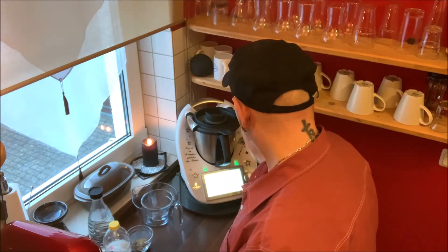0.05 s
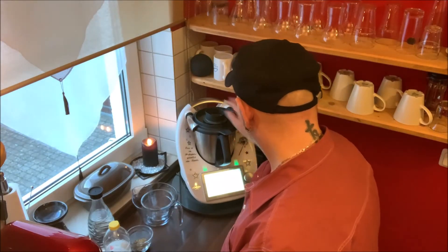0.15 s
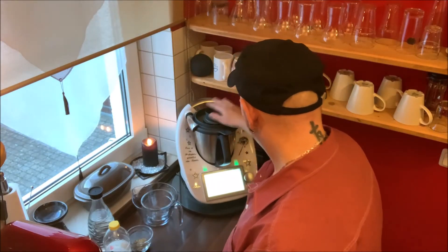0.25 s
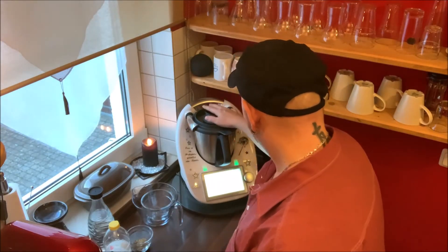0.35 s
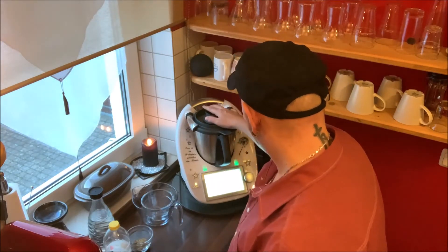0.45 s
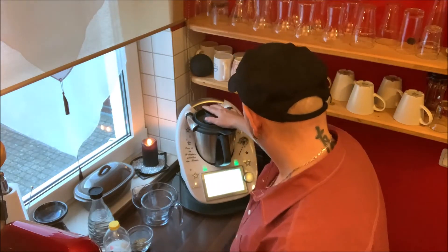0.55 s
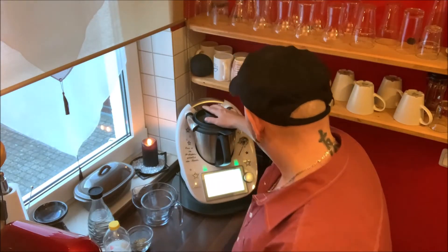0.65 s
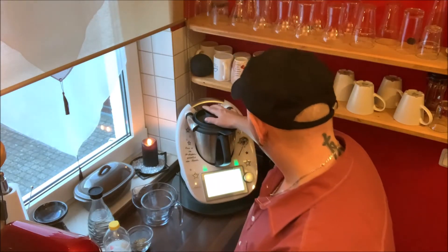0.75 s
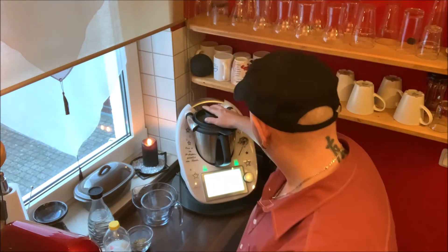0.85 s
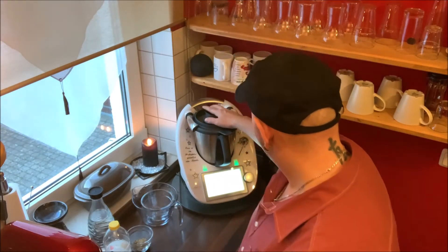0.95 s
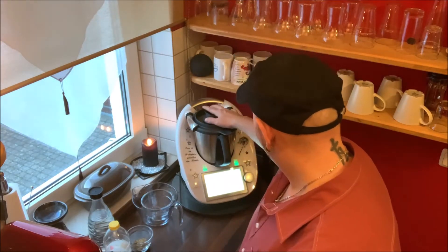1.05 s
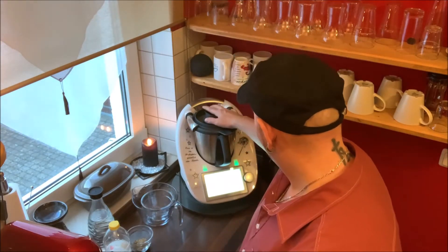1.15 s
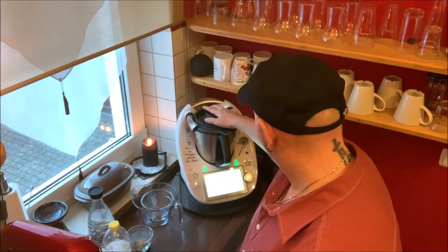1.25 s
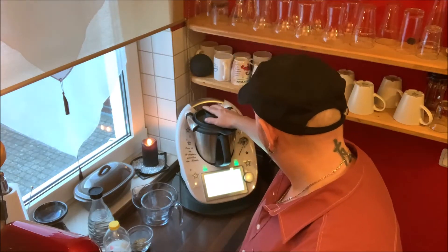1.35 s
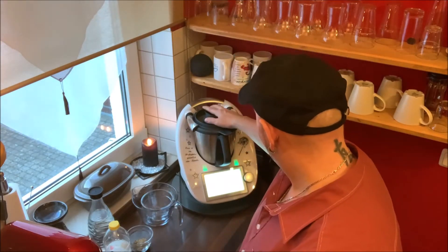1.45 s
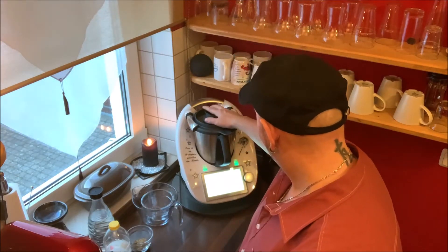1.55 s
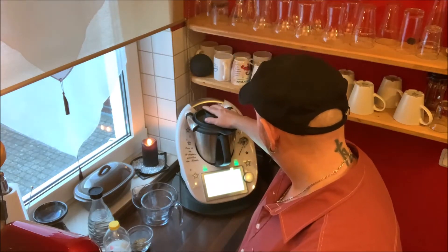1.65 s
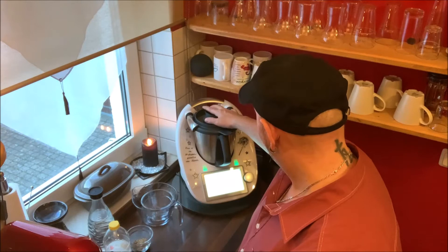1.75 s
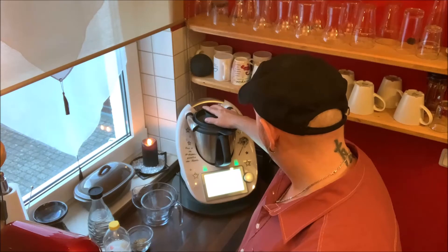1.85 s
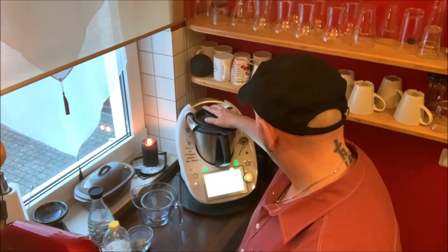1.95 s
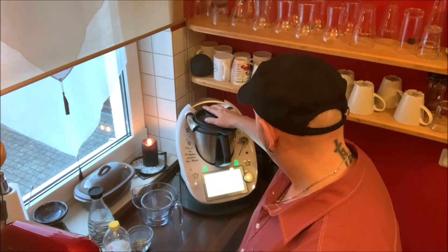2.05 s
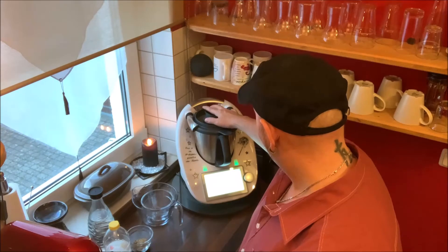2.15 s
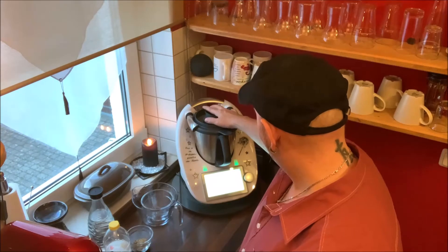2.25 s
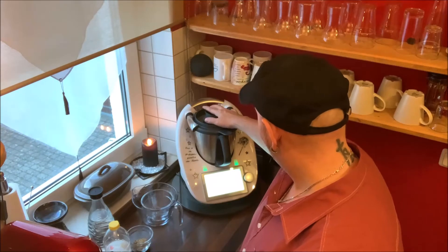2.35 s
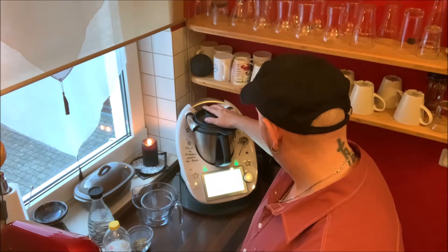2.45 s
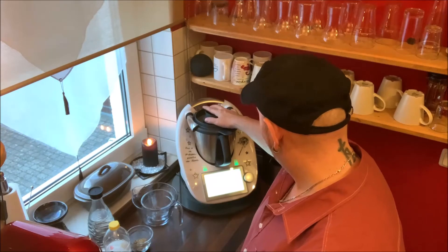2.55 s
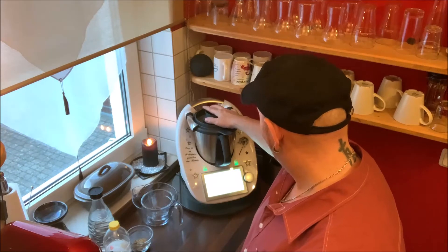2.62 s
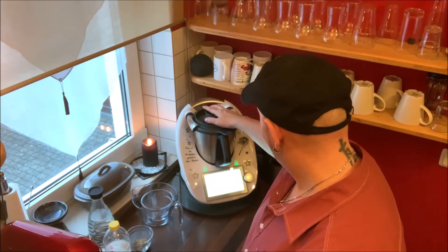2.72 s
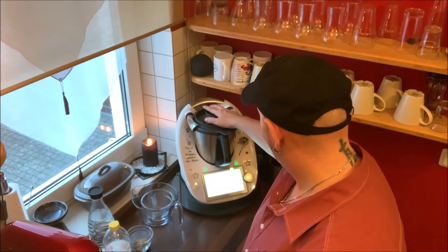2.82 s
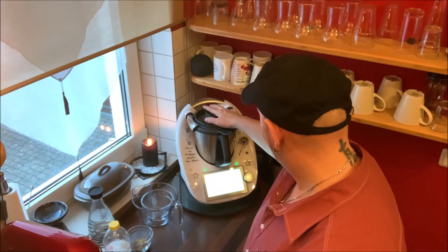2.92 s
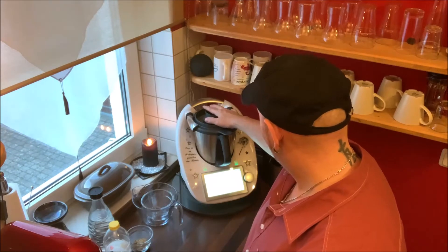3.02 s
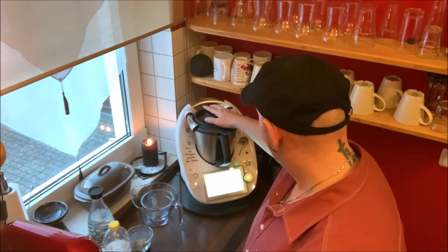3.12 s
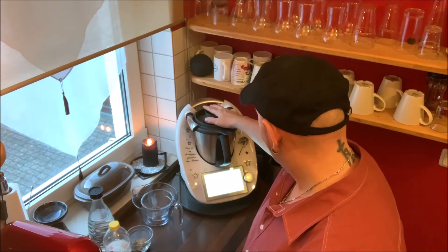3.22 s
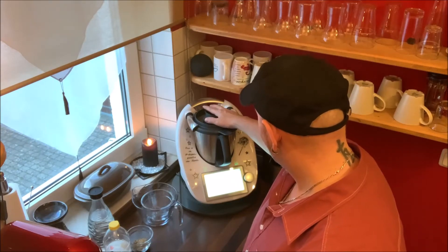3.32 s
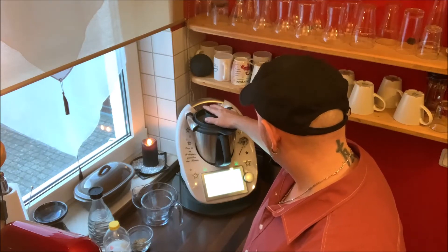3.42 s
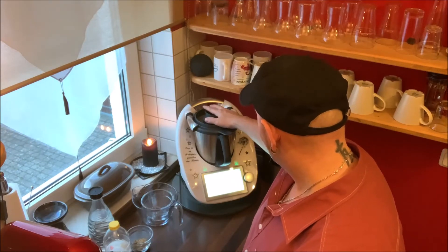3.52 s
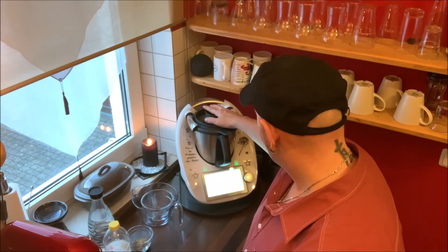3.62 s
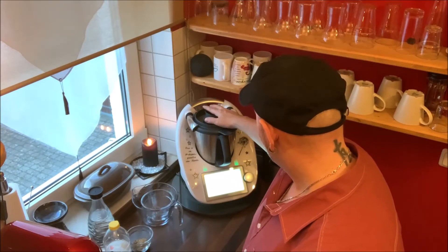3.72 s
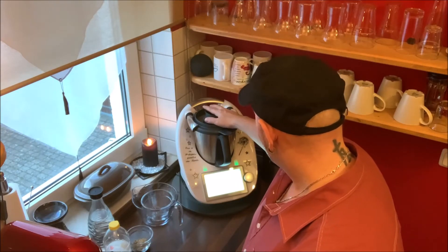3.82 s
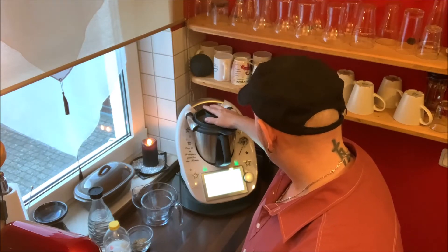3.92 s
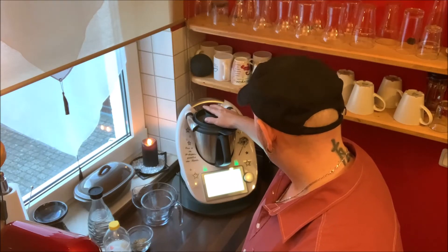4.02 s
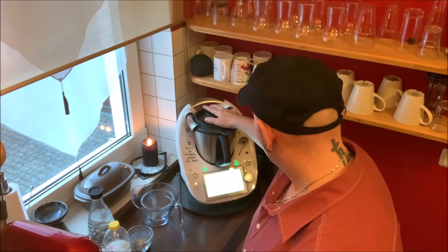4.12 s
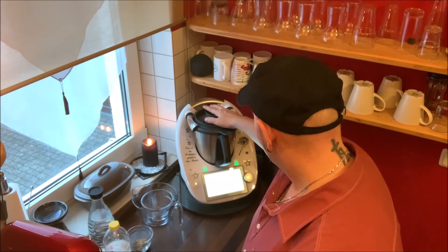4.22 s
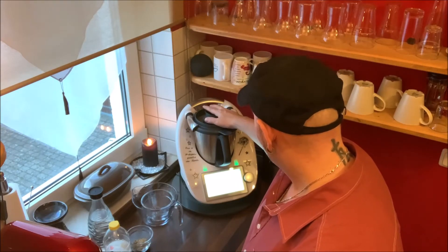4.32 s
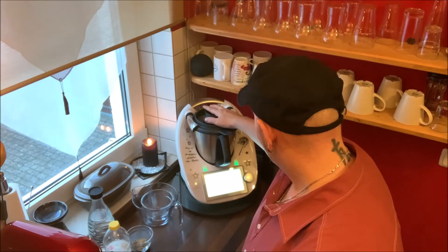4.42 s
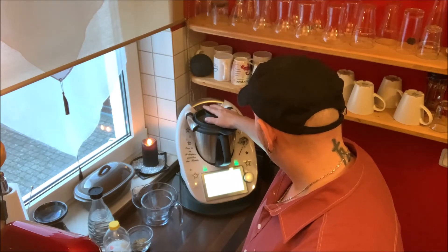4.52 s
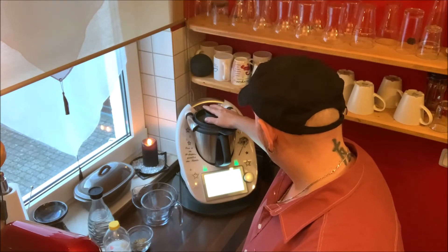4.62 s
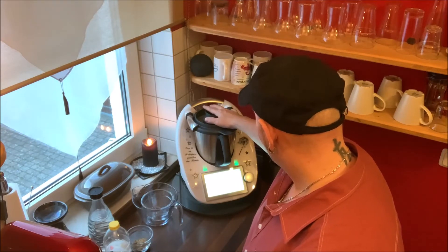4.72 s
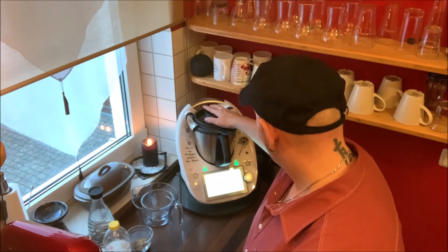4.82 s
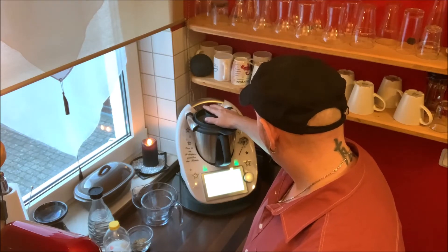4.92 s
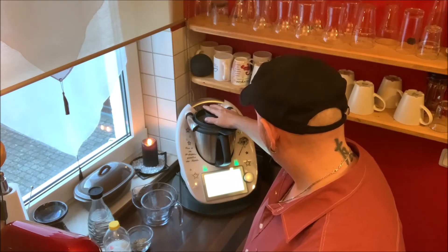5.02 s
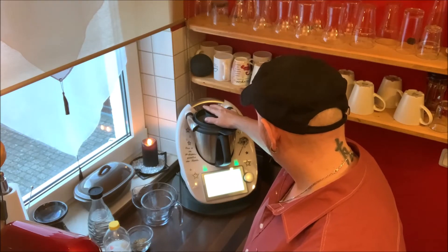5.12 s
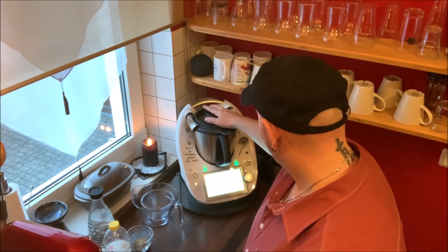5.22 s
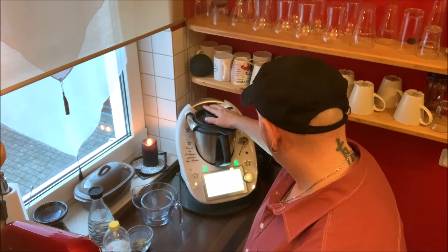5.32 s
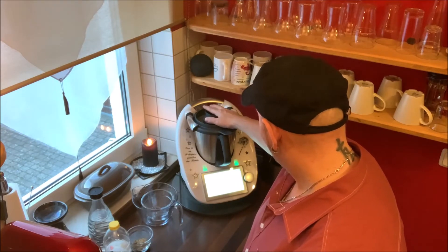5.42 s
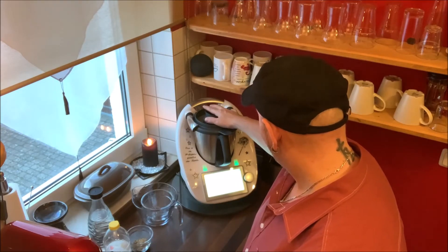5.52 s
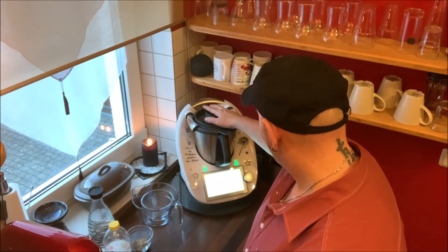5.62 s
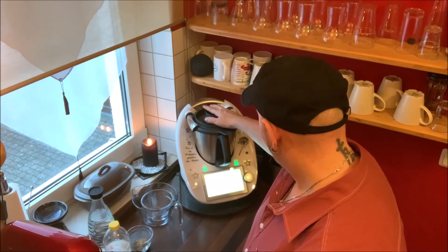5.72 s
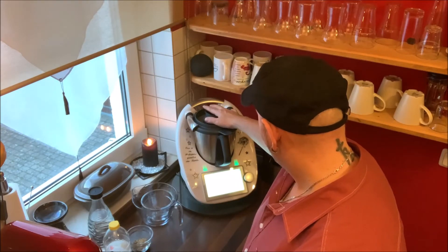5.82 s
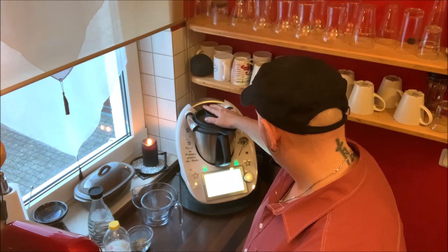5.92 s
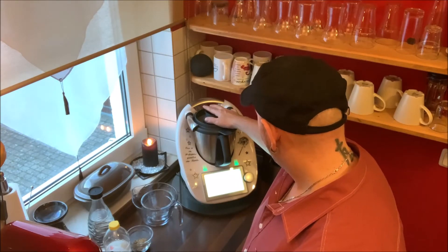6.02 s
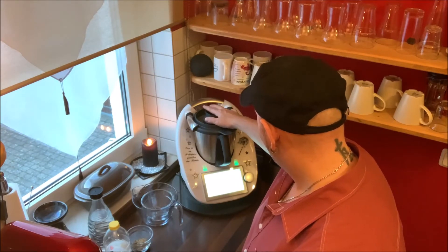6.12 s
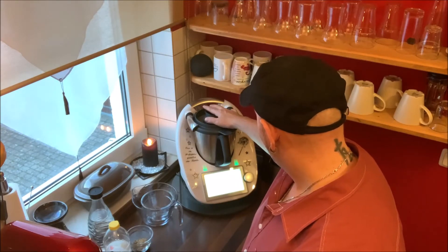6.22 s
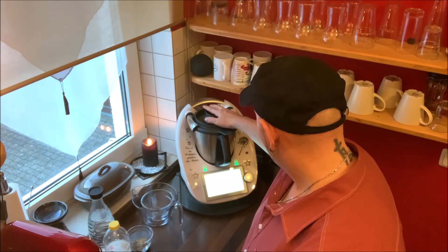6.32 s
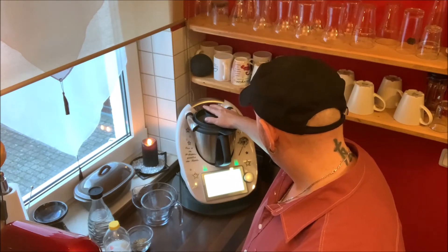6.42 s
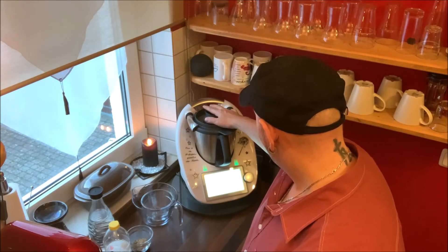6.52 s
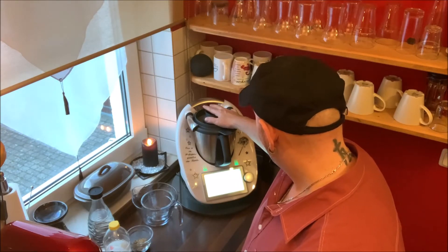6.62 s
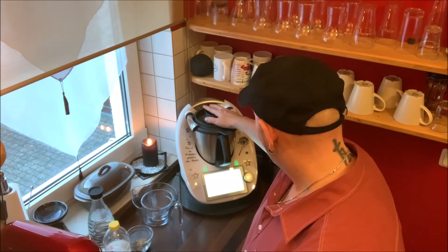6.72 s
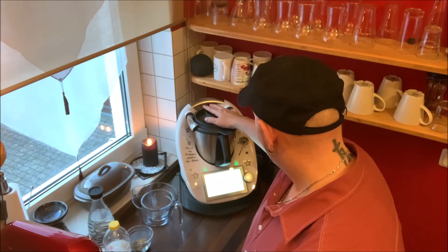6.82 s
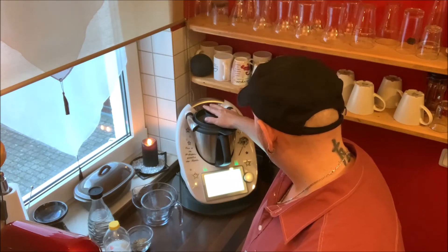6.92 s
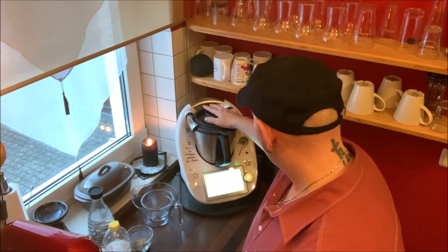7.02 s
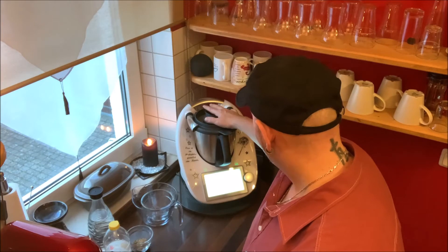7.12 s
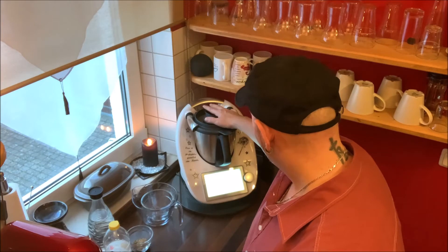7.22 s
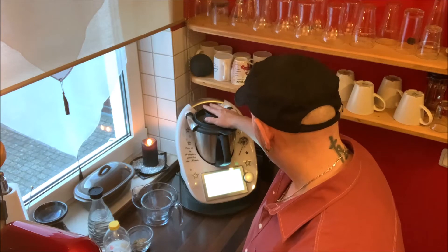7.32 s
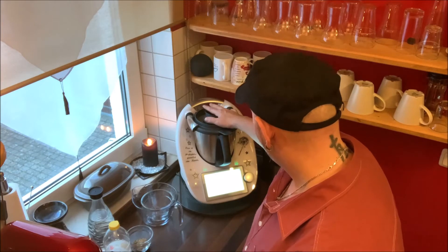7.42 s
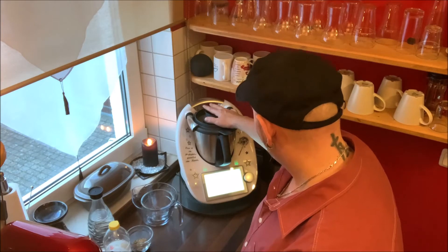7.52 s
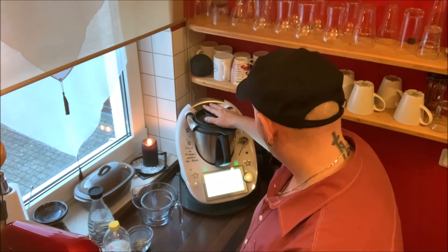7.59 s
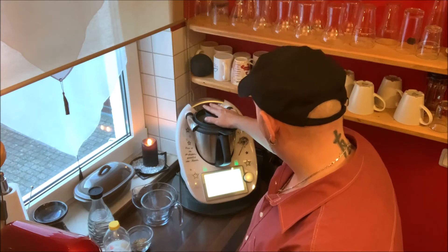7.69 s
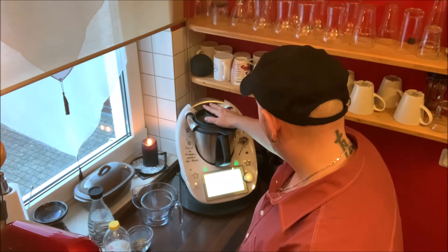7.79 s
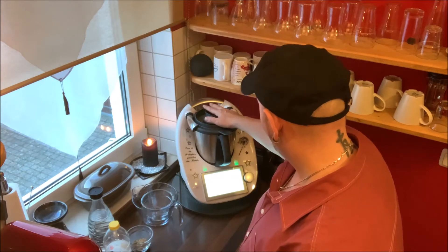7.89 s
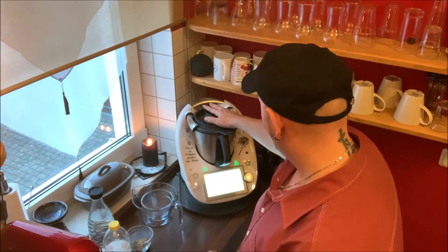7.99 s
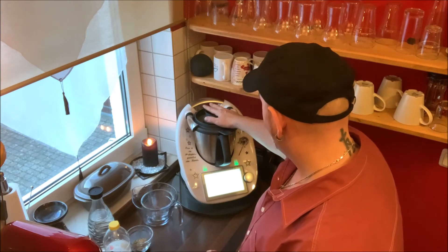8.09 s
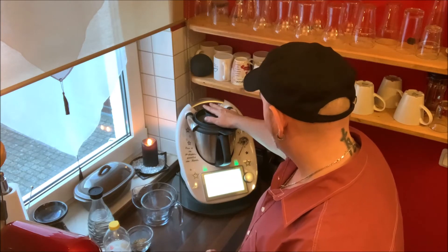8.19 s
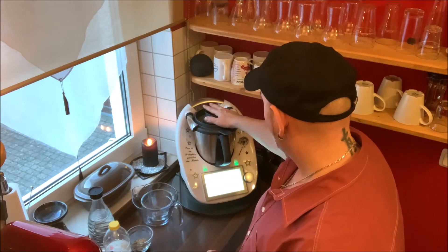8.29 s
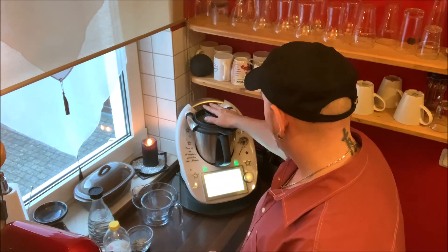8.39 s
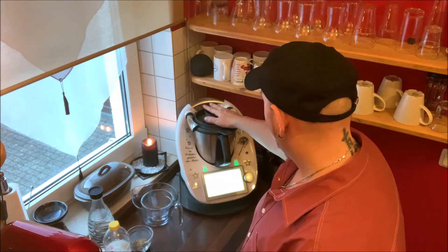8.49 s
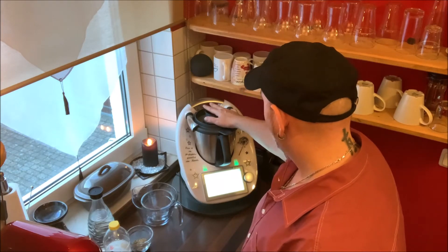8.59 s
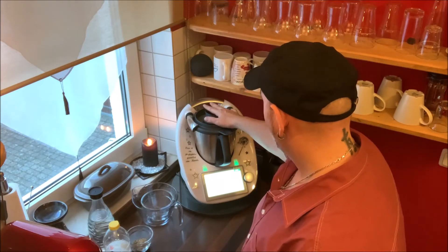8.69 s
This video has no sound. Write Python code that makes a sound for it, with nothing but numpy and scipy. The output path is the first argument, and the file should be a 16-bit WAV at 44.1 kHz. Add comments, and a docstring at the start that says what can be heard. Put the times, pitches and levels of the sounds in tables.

```python
"""Food processor on a kitchen counter

The lid slides into place with thuds and a few latch clicks, and the motor starts with a whine.
The blade then throws hard pieces against the steel bowl in a dense rattle until it is switched off.
Noise bursts model the blows, noise-driven resonances the ringing bowl, housing and counter, and
sine multiples of a wandering pulse rate the loaded motor, all in stereo in a small tiled room.
"""
import sys
import numpy as np
from scipy import signal
from scipy.fft import rfft, irfft, next_fast_len
from scipy.io import wavfile
from scipy.ndimage import uniform_filter1d, map_coordinates

SR = 44100
rng = np.random.default_rng(int(sys.argv[2]) if len(sys.argv) > 2 else 0)


def store_pcm(level_fs):
    """Save levels as 16-bit WAV."""
    pcm = np.round(np.clip(level_fs, -1, 1) * 32767).astype(np.int16)
    wavfile.write(sys.argv[1], SR, np.atleast_2d(pcm).T)


N = 385875
M = next_fast_len(N + SR // 2)  # transform length, in samples
HZ = np.fft.rfftfreq(M, 1 / SR)
TOP_HZ = 15800  # nothing is heard above this

# The still kitchen's colour. Each row: frequency in Hz, relative density in dB per Hz.
QUIET_COLOUR = [(15, -30), (25, 8), (69, 3), (289, -20), (523, -18), (631, -27), (703, -19), (1200, -21),
                (3930, -24), (7700, -30), (12500, -28), (15500, -39)]
QUIET_DB = -69.5
# Reverberation of the room. Each row: frequency in Hz, t60 in seconds.
KITCHEN_T60 = [(200, 0.47), (2000, 0.48), (8000, 0.36), (14000, 0.24)]
# Left-right likeness of the noise. Each row: frequency in Hz, correlation.
ALIKE = [(300, 0.45), (1200, 0.31), (2000, 0.79), (3300, 0.073), (5500, 0.24), (9000, 0.39), (12000, 1),
         (15000, .5)]
# Balance of noise. Each row: frequency in Hz, left minus right in dB.
LEAN = [(1000, -2.5), (5500, -0.5), (9000, 4), (15000, -2)]
# Phase of noise. Each row: frequency in Hz, left's lead in radians.
LEAD = [(1000, 0), (1700, -1.5), (3100, -.4), (3960, .3), (7320, -3.5), (9650, -1.8), (11200, -.2),
        (12700, .2), (15400, 2.5)]

# Colour of the sliding lid's scrape. Each row: frequency in Hz, relative density in dB per Hz.
SCRAPE_COLOUR = [(150, -57), (250, -14), (505, -8), (664, -18), (761, -6), (1040, -18), (1560, -10),
                 (2160, -13), (3440, -7), (4300, -21), (5370, -14), (6050, -21), (15000, -43)]
# Rings of the sliding lid. Each row: frequency in Hz, width in Hz, left and right relative
# level in dB, left's lead in radians. All mode tables share these columns.
RIM_MODES = [(760, 56, -8, -12, 0), (940, 67, 3, -6, 0), (1770, 30, -6, -6, 0), (1980, 53, -5, -5, 0),
             (2300, 47, -10, -11, 0), (2670, 50, -5, -5, 0), (2900, 57, -7, -7, 0), (3120, 45, -7, -8, 0),
             (3400, 130, -7, -9, 0), (3640, 60, -8, -8, 0), (5230, 140, -13, -14, 0),
             (5500, 140, -14, -15, 0)]
# Slide and boom hold, then die away.
SLIDE_HOLD_S, SLIDE_ROUGH_DB = 0.053, 1
SCRAPE_DB, SCRAPE_DIES_DB_PER_S = -43.5, 137
BOOM_DB, BOOM_DIES_DB_PER_S = -45.5, 168
# Latch clicks. Each row: start in seconds, level in dB, dB added to the colour below 4.5 kHz,
# dB added to it from 7.5 to 9.5 kHz, rise in seconds.
CLICKS = [(0.34, -42.5, 1.5, -7, .003), (0.4774, -41.5, 1.5, -5, .001), (0.719, -41.5, 0, 0, 0.0034)]
# Colour of a click before those additions. Each row: frequency in Hz, relative density in dB per Hz.
LATCH_COLOUR = [(400, -10.5), (1080, -15), (1300, -14), (2900, -12), (4200, -15), (5600, -12.5),
                (7000, -13.5), (8600, 1), (10000, -10), (11200, -1), (12500, -0.5), (13400, -10),
                (14500, -15), (15700, -22)]
# Rings of a click in the lid, with the columns of the mode tables.
CATCH_MODES = [(834, 40, -1, -3, 0), (1050, 41, 0, -2, 0), (1610, 35, -2, 0, 0), (1770, 51, -12, -12, 0),
               (1990, 60, -10, -7, 0), (2800, 84, -4, 1, 0), (3120, 50, -4, -2, 0), (3790, 72, -6, -7, 0),
               (4330, 200, -12, -12, 0)]
CATCH_DB, CATCH_T60_S = -13.5, 0.3  # level relative to the click, decay
# Thumps of the hand on the lid, jolts of the starting motor and the blade's first bite.
# Each row: start in seconds, tone level in dB, noise level in dB, frequency in Hz,
# rise in seconds, t60 in seconds.
THUMPS = [(.018, -52, -56, 3460, .006, .09), (1.344, -40, -14, 2800, 0.0027, 0.087),
          (.256, -60, -53, 955, 0.0047, 0.3), (0.264, -71, -49, 250, 0.0098, 0.34),
          (.36, -23.5, -32, 108.6, 0.02, 0.23), (.365, -39, -40.5, 391, 0.013, 0.2),
          (.45, -40, -48, 108, 0.0091, .25), (.724, -50, -60, 1082, .008, 0.14),
          (0.788, -56, -71, 108, .01, 0.17), (.808, -57, -66, 1082, .004, .07),
          (1.14, -43, -46, 196, 0.075, 0.55), (1.35, -18, -40, 197.3, 0.046, 0.64),
          (1.08, -55, -70, 966, 0.017, .4), (1.31, -14.5, -32, 97.5, 0.033, 0.3),
          (1.31, -29, -36, 60, 0.022, 0.33), (1.332, -40, -11, 1410, 0.01, 0.19)]

# The starting motor. Each row: time in seconds, high whine in dB, low whine in dB.
SPIN_UP = [(1.02, -91, -93), (1.045, -76, -81), (1.082, -88, -88), (1.091, -76, -66), (1.105, -60, -63),
           (1.13, -58, -61), (1.15, -61, -59), (1.175, -52, -59), (1.222, -50, -66), (1.238, -47, -60),
           (1.248, -40, -58), (1.27, -33, -42), (1.3, -33, -21), (1.39, -45, -23.5), (1.46, -51, -34),
           (1.55, -53, -49)]
# Tones of the high whine, with the columns of the mode tables.
HIGH_WHINE_MODES = [(1947, 52, 9, 12, -1.8), (2570, 110, -12, -9, 0), (2200, 500, -21, -21, 0)]
# Tones of the low whine, with the columns of the mode tables.
LOW_WHINE_MODES = [(955, 32, 4, 4, 0.95), (752, 20, -16, -8.5, 0), (1550, 90, -9, -7, 0.11),
                   (1256, 550, -14, -20, 0)]

# How hard pieces strike the steel. Each row: time in seconds, level of the rattle in dB.
STRIKES = [(1.12, -86), (1.2, -78), (1.235, -60), (1.262, -52), (1.291, -34.5), (1.309, -21), (1.34, -19),
           (1.42, -22.5), (1.5, -25), (1.58, -22.5), (2.15, -27), (2.27, -24.5), (2.35, -27), (2.58, -23.5),
           (2.72, -25.5), (2.85, -23.5), (3.0, -25.5), (3.2, -25), (4.2, -25.5), (5.0, -25.5), (6.1, -26.5),
           (7.35, -27.5), (8.6, -28), (8.692, -33.5), (8.75, -46)]
BITE_S, BITE_DIES_S = 1.37, 0.079  # first bite into the whole load, decay of the extra level after it
STOP_S = 8.61  # the motor is switched off
RATTLE_SWELL_DB, SWELLS_PER_S = 0.47, 16  # the load tumbles unevenly
# Colour of the rattle. Each row: frequency in Hz, relative density in dB per Hz.
CLATTER_COLOUR = [(40, -58), (150, -48), (310, -34), (450, -31.5), (700, -24.5), (1200, -26), (2400, -23.5),
                  (4000, -22), (6500, -25), (7200, -55), (9000, -120)]
# Colour of the crumbs' fizz. Each row: frequency in Hz, relative density in dB per Hz.
FIZZ_COLOUR = [(4000, -42), (6800, -2), (7650, -2.5), (8350, 2.5), (9200, -1), (9650, 1), (10200, -2.5),
               (11300, -4), (12500, -5.5), (14400, -7), (15100, -12), (15300, -45), (15700, -50)]
# Upper bowl modes, heard inside the rattle, with the columns of the mode tables.
SHELL_MODES = [(1422, 42, -19.5, -28, 2.2), (1570, 31, -35, -31, 1), (1762, 19, -12.5, -13, -1.1),
               (1816, 55, -19, -17, -2), (1945, 53, -15, -15.5, -2), (2220, 62, -31, -31, 2),
               (3543, 127, -18, -19.5, -2.1), (3923, 72, -18.5, -27.5, 0.5), (4250, 83, -19.5, -16.5, 1.5),
               (4920, 106, -18.5, -36, -0.5), (5535, 460, -29, -26.5, 1.1), (5680, 120, -18.5, -23, 1.5),
               (6880, 83, -28.5, -28.5, -0.5)]
# Noisy band around the motor's 1 kHz tone, with the columns of the mode tables.
TONE_BAND_MODES = [(977, 26, -4, -6.5, 0.83), (1014.3, 28, 0, 0.5, 1)]
# Low hum modes, with the columns of the mode tables.
HUM_MODES = [(173.2, 7.8, -9, -8.5, -.2), (198.2, 21.3, -3.5, -10, 0.044)]
# Lid modes, with the columns of the mode tables.
LID_MODES = [(650.5, 39, -16, -14.5, -4), (706, 27.5, -14.5, -10.5, 1.5), (749.4, 22.7, -7.5, -5, 1.84),
             (821, 17, -14, -13.5, 1.5), (904, 21, -15, -11, 2), (956, 47, -11, -13, 2)]
# Housing modes, with the columns of the mode tables.
HOUSING_MODES = [(270, 19.5, -20.5, -19.5, -4), (283, 3.5, -25, -23, -0.5),
                 (339.5, 15.6, -21.5, -16.5, 0.5), (370.4, 30, -20, -18, 0.5), (403.5, 26, -17, -27.5, 1),
                 (482.6, 34, -22.5, -18, 2.5), (524, 5.8, -17.5, -20.5, 2)]
# Counter modes, with the columns of the mode tables.
COUNTER_MODES = [(84, 27, -44, -37, 0), (101.6, 14, -18.5, -24.5, 0), (128.5, 14, -23, -29, 0)]
# Bowl wall modes, with the columns of the mode tables.
WALL_MODES = [(2742, 200, -10, -9, -1.2), (2830, 69, -7, -7.5, -0.64)]
# Response of each part to the strikes: dB over the rattle, drift in dB per second as the pieces get
# smaller, extra level in dB up to the bite, dying away after it, delay in seconds (held within 0.015
# either way), random swell in dB, gain on the rattle after the stop in dB per second.
FIZZ_PART = (-4.5, .5, 2.5, 2, 0.55, -18)
# Noisy band around the motor's 1 kHz tone, in the same columns.
TONE_BAND_PART = (-11, 0.63, 0, -2, 1.5, -75)
# Hum, in the same columns.
HUM_PART = (-9.5, 0.07, 5, 1, 1.5, 45.5)
# Lid, in the same columns.
LID_PART = (-3, -0.1, -4, -0.2, 1.67, 37.5)
# Housing, in the same columns.
HOUSING_PART = (-8.5, -0.18, 1, -0.5, 1.55, 15)
# Counter, in the same columns.
COUNTER_PART = (-20, -0.38, 10, -0.7, 0.5, 111)
# Bowl wall, in the same columns.
WALL_PART = (-6, -0.54, 2.5, .002, 1, -15)

# Large pieces hitting the bowl wall. Each row: start in seconds, level in dB.
CHUNKS = [(1.2988, -18.5), (1.3956, -18), (1.653, -28.5), (1.7723, -18), (1.8087, -16), (1.8805, -22),
          (2.0227, -11), (2.2043, -14.5), (2.556, -15), (2.7445, -28), (2.8867, -22), (3.0209, -19),
          (3.0653, -15), (3.1806, -16.5), (3.2728, -16), (3.3636, -17), (3.414, -23), (3.4604, -28),
          (3.7857, -16), (4.2252, -30), (4.3424, -13), (4.4087, -13), (4.6028, -16.5), (4.6482, -15.5),
          (4.711, -13), (4.8338, -16), (4.9705, -15), (5.1206, -20), (5.1965, -18), (5.3062, -17),
          (5.5083, -18), (5.57, -14), (5.8495, -17.5), (5.9403, -20), (6.1074, -20.5), (6.2361, -30),
          (6.505, -10.5), (6.9176, -23), (7.1974, -19), (7.388, -17), (7.6191, -22), (7.7576, -17),
          (7.8499, -19), (7.9243, -33), (8.1069, -19), (8.284, -22), (8.3698, -22), (8.4157, -21)]

# The loaded motor. Each row: time in seconds, pitch of the 5th multiple of its pulse rate in Hz.
SPEED = [(1.38, 1002), (1.46, 978.1), (1.54, 987.7), (1.6, 1021), (1.64, 990.2), (1.74, 986.3),
         (1.83, 1001), (1.97, 993.8), (2.25, 998.7), (2.33, 1020), (2.39, 995.5), (2.57, 989.3),
         (2.66, 997.6), (2.7, 1019), (2.78, 1000), (2.84, 1009), (3.0, 992.0), (3.08, 1003), (3.26, 990.9),
         (3.39, 1012), (3.41, 998.6), (3.67, 1009), (3.75, 990.4), (3.81, 1009), (3.95, 996.8),
         (4.24, 998.7), (4.28, 1013), (4.34, 994.3), (4.6, 1009), (4.62, 993.0), (4.73, 992.1),
         (4.76, 1005), (4.93, 990.0), (5.05, 1000), (5.15, 1021), (5.19, 992.1), (5.25, 1016), (5.39, 1004),
         (5.45, 985.3), (5.49, 1004), (5.56, 999.6), (5.6, 1008), (5.78, 996.7), (5.82, 1010),
         (6.25, 990.5), (6.35, 1004), (6.67, 994.5), (6.75, 1006), (6.98, 998.7), (7.12, 1014),
         (7.18, 978.1), (7.22, 980.0), (7.26, 1000), (7.52, 1009), (7.81, 995.1), (7.87, 1008),
         (8.4, 991.8), (8.46, 1008), (8.6, 998.6), (8.66, 1013)]
# Its loudness. Each row: time in seconds, level of the 5th multiple in dB, of the 1st in dB.
SINGING = [(1.38, -40, -31), (1.44, -35, -24), (1.48, -32, -46), (1.56, -45, -28), (1.64, -39, -49),
           (1.76, -34, -22.5), (1.83, -31, -34), (1.89, -42, -30), (1.97, -31, -30), (2.03, -31, -44),
           (2.09, -34, -26), (2.17, -31.5, -39), (2.27, -38, -21.5), (2.31, -37.5, -46), (2.61, -34, -33),
           (2.74, -32.5, -55), (2.86, -39, -31), (2.92, -35, -48), (2.96, -31.5, -32), (3.06, -34, -27),
           (3.12, -36, -47), (3.22, -33, -27), (3.3, -32, -40), (3.77, -37, -28), (3.93, -31.5, -44),
           (4.38, -34, -25.5), (4.46, -30, -33), (4.56, -41, -35), (4.74, -32, -49), (4.8, -35, -28),
           (4.89, -28.5, -40), (4.97, -29, -26.5), (5.41, -40, -43), (5.43, -31.5, -34), (5.62, -35, -34),
           (5.68, -31, -53), (5.74, -30.5, -27), (5.84, -35.5, -45), (5.96, -30.5, -26), (6.04, -31, -54),
           (6.25, -32, -31), (6.63, -29.5, -45), (6.69, -28.5, -30), (6.81, -36, -35), (6.85, -31, -49),
           (6.9, -29.5, -36), (7.14, -35, -34.5), (7.46, -29, -33), (7.58, -42, -33), (7.62, -28, -33.5),
           (7.77, -37.5, -40), (7.83, -27.5, -31), (7.91, -36, -34), (7.95, -33, -50), (8.25, -30.5, -32),
           (8.29, -32, -49), (8.35, -28, -37), (8.54, -35, -31), (8.58, -31.5, -44), (8.66, -44, -32)]
# Multiples that stand out. Each row: multiple, left and right gain in dB, left's lead in radians.
# The 1st follows its own level, the rest that of the 5th.
MULTIPLES = [(1, 2, -7, -0.1), (5, 2.5, 3.5, 1), (7, -22, -21, 2.5), (9, -14, -26, -1), (10, -19, -12, -1)]
FLUTTER_HZ, FLUTTERS_PER_S = 0.5, 18  # the load shakes the pulse rate
# The load shakes the level; the tone's phase drifts at random between left and right.
TONE_SWELL_DB, DRIFT_RAD = 1.2, 0.4
HUM_SURGE_DB, HUM_SLIP_RAD = 1.5, 0.6  # the rocking housing makes the 1st multiple surge and slip

# Hard crumbs snapping on the blade. Each row: start in seconds, peak level in dB.
SNAPS = [(1.5248, -17), (1.5881, -12), (1.7562, -14), (2.3499, -18), (2.535, -18), (3.1137, -15),
         (3.1516, -17), (3.3616, -10), (3.6834, -20), (3.7357, -10), (4.1478, -19), (4.3414, -21),
         (5.6429, -21), (5.9387, -20), (6.2755, -20), (6.7015, -11.5), (6.7629, -14), (7.3615, -16),
         (7.6763, -17), (7.8281, -14), (8.46, -20), (8.5413, -17)]
SNAP_T60_S, SNAP_CREST_DB = 0.049, 8  # decay; peak over mean strength


def amp(db):
    """Decibel law: the amplitude gain of a level in dB."""
    return 10 ** (np.asarray(db) / 20)


def unit(x):
    """Normalisation to a root mean square of 1."""
    return x / np.sqrt(np.mean(x ** 2) + 1e-20)


def along(points, hz):
    """Interpolation of (Hz, value) points on a logarithmic frequency axis."""
    f, v = np.transpose(points)
    return np.interp(np.log(hz + 1), np.log(f + 1), v)


def curves(rows):
    """Linear interpolation in time of each column, followed by a gate open only within the rows."""
    s, *cols = np.transpose(rows)
    t = np.arange(N) / SR
    return [np.interp(t, s, c) for c in cols] + [(t >= s[0]) & (t <= s[-1])]


def wobble(rate):
    """Random modulation: a smooth curve through rate random knots a second."""
    knots = rng.standard_normal(int(N * rate / SR) + 4)
    return map_coordinates(knots, [np.arange(N) * rate / SR])


def chance(*shape):
    """White noise: a complex Gaussian spectrum."""
    shape = (*shape, len(HZ))
    return rng.standard_normal(shape) + 1j * rng.standard_normal(shape)


def ringing(modes, stray=0.45, steep=1.57):
    """Modal resonance: noise, as of countless small blows, excites each mode; a stray part differs by side."""
    out = np.zeros((2, len(HZ)), complex)
    for hz, width, left_db, right_db, lead in modes:
        near = slice(*np.searchsorted(HZ, [hz / 3, 2 * hz + 500]))
        f = HZ[near]
        resonance = (f * width / (hz * hz - f * f + 1j * f * width)) ** steep
        common, left, right = rng.standard_normal((3, len(f))) + 1j * rng.standard_normal((3, len(f)))
        sides = amp([left_db, right_db]) * np.exp([0.5j * lead, -0.5j * lead])
        out[:, near] += resonance * (common + stray * np.array([left, right])) * sides[:, None]
    return out


def rush(colour):
    """Partial coherence: coloured noise is partly alike left and right, combed by standing waves."""
    a, b = chance(2) * amp(along(colour, HZ))
    turn = np.arccos(np.clip(along(ALIKE, HZ), -1, 1)) / 2
    lean = amp(along(LEAN, HZ) / 2) * np.exp(0.5j * along(LEAD, HZ))
    uneven = rng.standard_normal((2, len(HZ)))
    uneven = unit(uniform_filter1d(uniform_filter1d(uneven, size=90), size=90))
    comb = amp(along([(2500, 3.36), (6000, 2.6)], HZ) * uneven)
    left = (a * np.cos(turn) + b * np.sin(turn)) * lean
    right = (a * np.cos(turn) - b * np.sin(turn)) / lean
    return comb * np.array([left, right])


def sound(spectrum):
    """Fourier synthesis: samples of rms 1 from a stereo spectrum."""
    return unit(irfft(spectrum, M)[:, :N])


def even(x, span):
    """Envelope levelling: swells over span seconds are reduced, so that x sounds steadier."""
    size = round(span * SR)
    power = uniform_filter1d(uniform_filter1d(np.mean(x ** 2, axis=0), size), size)
    return unit(x / np.sqrt(np.abs(power) + 0.065))


def patchy(x, patch_db):
    """Time-frequency modulation: random patches of gain, the same on both sides."""
    z = signal.stft(x, nperseg=512)[2]
    field = rng.standard_normal(z.shape[1:])
    field = uniform_filter1d(uniform_filter1d(field, 8, 0), 6, 1)
    return unit(signal.istft(z * amp(patch_db * unit(field)), nperseg=512)[1][:, :N])


def hail(rate, spread_db, life):
    """Shot noise: random blows, rate a second, whose power decays with time constant life over a steady bed."""
    blows = (rng.random(N) < rate / SR) * amp(spread_db * rng.exponential(size=N)) ** 2
    power = signal.lfilter([1], [1, -np.exp(-1 / (life * SR))], blows)
    return unit(np.sqrt(power + 2.7 * power.mean()))


def bursts(events, t60, rise):
    """Exponential decay: the summed envelope of (s, dB) events with a quick rise."""
    out, t = np.zeros(N + SR), np.arange(SR // 8) / SR
    for s, db in events:
        out[round(s * SR):][:len(t)] += amp(db - 60 * t / t60) * (1 - np.exp(-t / rise))
    return out[:N]


def still_kitchen():
    """Background noise: a steady, coloured random sound."""
    return amp(QUIET_DB) * sound(rush(QUIET_COLOUR))


def room_burst(colour, crack_db):
    """Reverberant decay: an unevenly coloured burst dies at each frequency's own rate, with a crack on top."""
    hz, t, z = signal.stft(rng.standard_normal((2, SR // 2)), SR, nperseg=256)
    uneven_db = 3.5 * rng.standard_normal((len(hz), 1))
    decay_db = -60 * t / along(KITCHEN_T60, hz)[:, None]
    level_db = along(colour, hz)[:, None] + uneven_db + decay_db
    tail = signal.istft(z * amp(level_db), SR, nperseg=256)[1][:, :SR // 2]
    tail = tail / np.std(tail[:, :SR // 50])
    crack = amp(crack_db - 60 * np.arange(SR // 2) / SR / 0.026)
    return tail * (1 + crack)


def lid_slide():
    """Friction: the sliding lid gives a rough scrape, a ringing rim and a low boom that hold, then die."""
    dying = np.maximum(np.arange(N) / SR - SLIDE_HOLD_S, 0)
    scrape_db = SCRAPE_DB - SCRAPE_DIES_DB_PER_S * dying + SLIDE_ROUGH_DB * wobble(90)
    scrape = amp(scrape_db) * sound(rush(SCRAPE_COLOUR) + amp(-4) * ringing(RIM_MODES))
    low_rings = even(sound(ringing(COUNTER_MODES) + amp(-24) * ringing(HUM_MODES)), span=0.026)
    return scrape + amp(BOOM_DB - BOOM_DIES_DB_PER_S * dying) * low_rings


def thumps():
    """Damped oscillation: each thump is a dying tone inside a puff of noise around the same pitch."""
    out, t = np.zeros((2, N + SR)), np.arange(SR // 2) / SR
    for s, tone_db, noise_db, hz, rise, t60 in THUMPS:
        band = signal.butter(1, [hz * 0.53, hz * 1.4], "bandpass", fs=SR, output="sos")
        noise = rng.standard_normal((2, len(t)))
        puff = unit(signal.sosfilt(band, signal.sosfilt(band, noise)))
        tone = np.sin(2 * np.pi * hz * t) * amp([[2.5], [-2.5]])  # stronger on the left
        shape = amp(-60 * t / t60) * (1 - np.exp(-(t / rise) ** 2))
        out[:, round(s * SR):][:, :len(t)] += shape * (amp(tone_db) * tone + amp(noise_db) * puff)
    return out[:, :N]


def latch_clicks():
    """Impact: each click is a reverberant burst with lid rings, made uneven by a rattling catch."""
    out, t = np.zeros((2, N + SR)), np.arange(SR // 2) / SR
    jitter = hail(rate=300, spread_db=1, life=0.004)
    rings = sound(ringing(CATCH_MODES))
    for s, db, low_db, ping_db, rise in CLICKS:
        start = round(s * SR)
        colour = [(hz, level + low_db * (hz < 4500) + ping_db * (7500 < hz < 9500))
                  for hz, level in LATCH_COLOUR]
        burst = room_burst(colour, crack_db=-1)
        body = amp(CATCH_DB + low_db - 60 * t / CATCH_T60_S) * rings[:, start:][:, :len(t)]
        shape = (1 - np.exp(-(t / rise) ** 2)) * jitter[start:][:len(t)]
        out[:, start:start + len(t)] += amp(db) * (burst + body) * shape
    return out[:, :N]


def motor_start():
    """Forced resonance: the slow unloaded motor shakes a few housing tones."""
    high_db, low_db, on = curves(SPIN_UP)
    high = amp(high_db) * even(sound(ringing(HIGH_WHINE_MODES)), span=0.025)
    low = amp(low_db) * even(sound(ringing(LOW_WHINE_MODES)), span=0.037)
    return on * (high + low)


def shaken(over_db, drift, bite_db, late, swell_db, outlasts):
    """Driven response: the gain in time of one part of the machine follows the strikes."""
    t = np.arange(N) / SR
    s, strikes_db = np.transpose(STRIKES)
    since = np.maximum(t - BITE_S, 0)
    late = np.clip(late, -0.015, 0.015)
    # The delay applies only to the start.
    start = np.where(t < BITE_S + late, t - late, np.maximum(t, BITE_S))
    level_db = np.interp(start, s, strikes_db) + over_db + drift * since
    level_db = level_db + bite_db * np.exp(-since / BITE_DIES_S)
    level_db = level_db + outlasts * np.maximum(t - STOP_S, 0)
    return (t >= s[0]) * amp(level_db + swell_db * wobble(SWELLS_PER_S))


def chopping():
    """Random impacts: pieces hail on steel in a rattle and a fizz of crumbs, amid the machine's noisy bands."""
    blows = hail(rate=260, spread_db=1.65, life=0.0069) * amp(RATTLE_SWELL_DB * wobble(SWELLS_PER_S))
    rattle = blows * patchy(sound(rush(CLATTER_COLOUR) + ringing(SHELL_MODES)), patch_db=1.6)
    fizz = blows * patchy(sound(rush(FIZZ_COLOUR)), patch_db=1.0)
    tone_band = even(sound(ringing(TONE_BAND_MODES, stray=0.51, steep=1.68)), span=0.029)
    hum = even(sound(ringing(HUM_MODES, stray=0.16)), span=0.29)
    lid = even(sound(ringing(LID_MODES, stray=0.7, steep=1.65)), span=0.12)
    housing = sound(ringing(HOUSING_MODES, stray=0.34, steep=1.65))
    counter = even(sound(ringing(COUNTER_MODES, stray=0.19)), span=0.24)
    wall = unit(blows * sound(ringing(WALL_MODES, steep=1.85)))
    out = shaken(0, 0, 0, 0, 0, 0) * unit(rattle) + shaken(*FIZZ_PART) * unit(fizz)
    out = out + shaken(*TONE_BAND_PART) * tone_band + shaken(*HUM_PART) * hum
    out = out + shaken(*LID_PART) * lid + shaken(*HOUSING_PART) * housing
    return out + shaken(*COUNTER_PART) * counter + shaken(*WALL_PART) * wall


def chunks():
    """Impact: a large piece is a quick burst of clatter, bowl modes and a little fizz."""
    colour = rush(CLATTER_COLOUR) + ringing(WALL_MODES + SHELL_MODES) + amp(-24.5) * rush(FIZZ_COLOUR)
    return bursts(CHUNKS, t60=0.049, rise=0.0031) * sound(colour)


def motor_running():
    """Harmonic series: the motor sings multiples of a pulse rate that wanders as the blade meets more or less food."""
    fifth_hz, on = curves(SPEED)
    fifth_db, first_db, _ = curves(SINGING)
    pulse_hz = fifth_hz / 5 + FLUTTER_HZ * wobble(FLUTTERS_PER_S)
    phase = 2 * np.pi * np.cumsum(pulse_hz) / SR
    out = np.zeros((2, N))
    for k, left_db, right_db, lead in MULTIPLES:
        swell_db = TONE_SWELL_DB * np.array([wobble(SWELLS_PER_S), wobble(SWELLS_PER_S)])
        level_db = (first_db if k == 1 else fifth_db) + swell_db
        apart = lead + DRIFT_RAD * np.sqrt(k) * wobble(SWELLS_PER_S / 2)
        slip = 0
        if k == 1:
            level_db = level_db + HUM_SURGE_DB * wobble(2 * SWELLS_PER_S)
            slip = HUM_SLIP_RAD * wobble(SWELLS_PER_S)
        tone = np.sin(k * phase + slip + np.array([[0.5], [-0.5]]) * apart)
        out += amp(level_db) * amp([[left_db], [right_db]]) * tone
    fade = uniform_filter1d(on * 1.0, size=2000)
    return np.sqrt(2) * fade * out  # root 2 turns the rms levels into sine amplitudes


def snaps():
    """Brittle fracture: a snapping crumb is a short bright spit of noise."""
    mean_levels = [(s, db - SNAP_CREST_DB) for s, db in SNAPS]
    return bursts(mean_levels, SNAP_T60_S, rise=0.001) * sound(rush(FIZZ_COLOUR))


def scene():
    """Superposition: the still kitchen, the lid and the machine add."""
    lid = lid_slide() + thumps() + latch_clicks()
    machine = motor_start() + chopping() + chunks() + motor_running() + snaps()
    return still_kitchen() + lid + machine


def record(dry):
    """Band limitation: nothing above TOP_HZ is kept."""
    return irfft(rfft(dry, M) * (HZ < TOP_HZ), M)[:, :N]


dry = scene()
out = record(dry)
store_pcm(out)
```